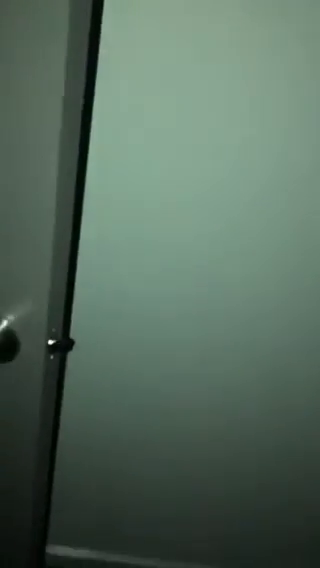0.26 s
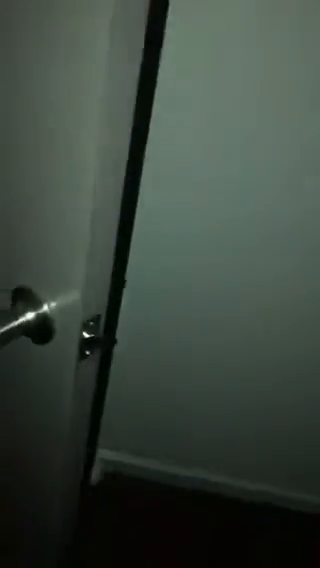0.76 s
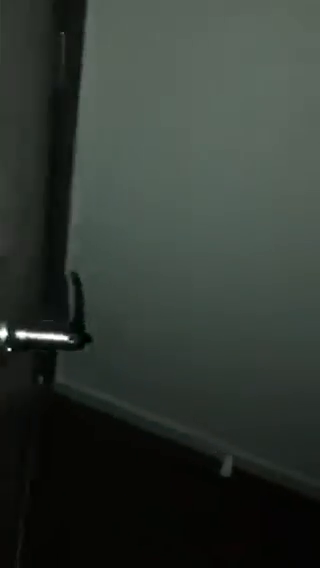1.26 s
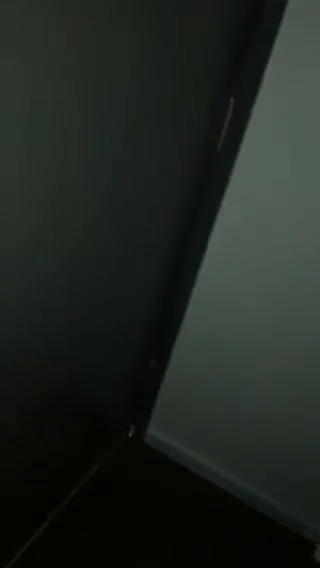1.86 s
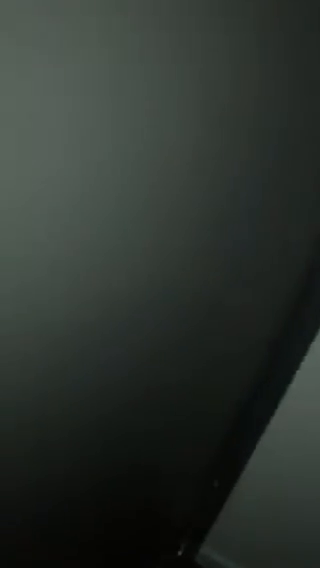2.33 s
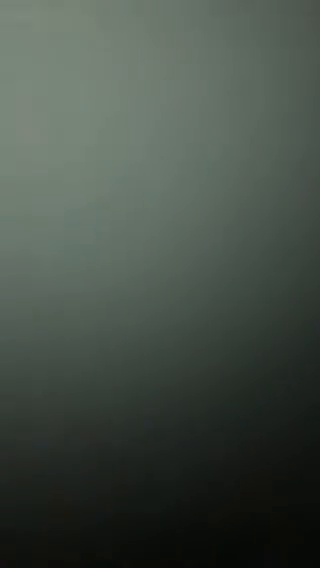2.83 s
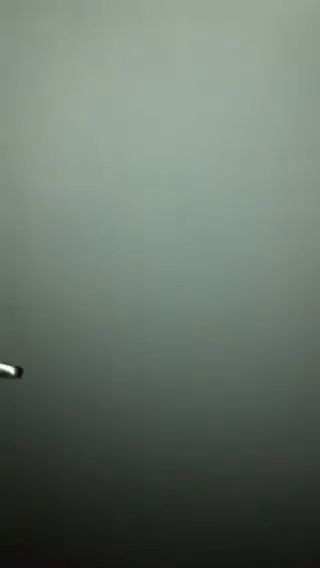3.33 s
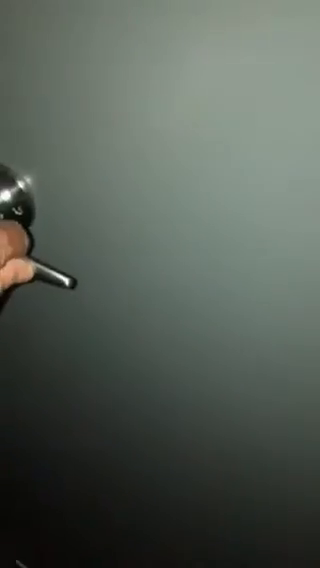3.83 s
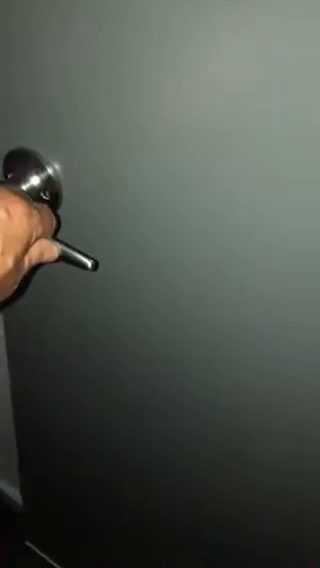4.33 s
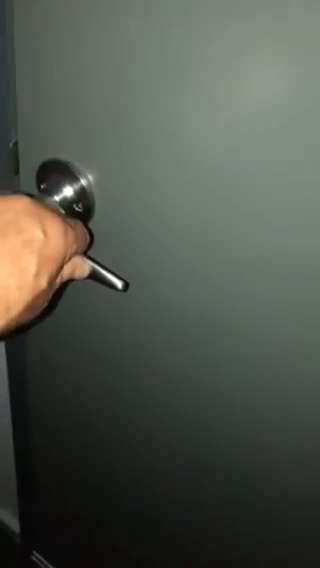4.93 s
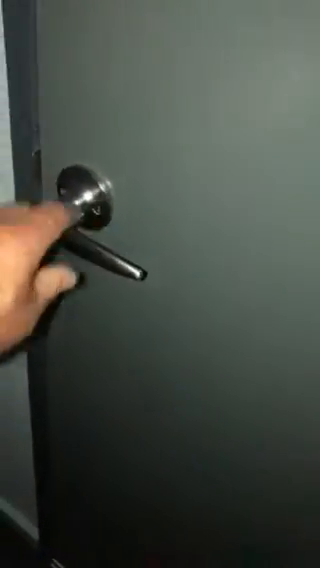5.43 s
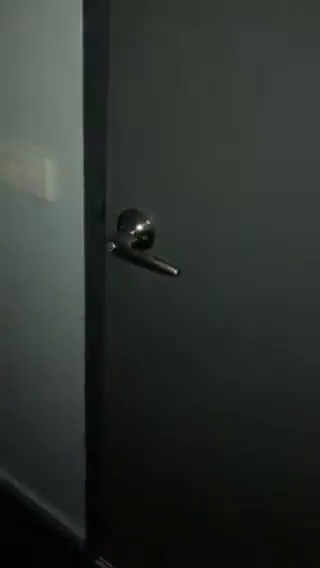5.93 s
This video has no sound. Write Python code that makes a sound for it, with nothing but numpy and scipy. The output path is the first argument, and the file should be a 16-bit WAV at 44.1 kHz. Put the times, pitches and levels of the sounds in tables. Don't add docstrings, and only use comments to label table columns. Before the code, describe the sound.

Phone microphone at arm's length from a door in an empty reverberant space. Quiet air and a wavering low hum behind the wall. Muffled footsteps, a low thud and irregular wooden knocks come first, with sleeve rustle and tiny clicks. The lock then clacks crisply, catches, and the lever drops with the loudest metallic crack, followed by a soft door thud and settling feet in the fading echo.

```python
import sys
import numpy as np
from scipy import signal
from scipy.fft import rfft, irfft
from scipy.io import wavfile
from scipy.ndimage import uniform_filter1d

SR = 44100
rng = np.random.default_rng(int(sys.argv[2]) if len(sys.argv) > 2 else 0)


def generate_wav(sig):
    pcm = np.round(np.clip(np.atleast_2d(sig).T, -1, 1) * 32767).astype(np.int16)
    wavfile.write(sys.argv[1], SR, pcm)


def to_linear_factor(level_db):
    exponent = np.asarray(level_db, float) / 20
    return 10 ** exponent


N = 272559
T = np.arange(N) / SR

# frequency in Hz, density in dB per Hz.
AIR_COLOUR = [(18, -36), (55, -5), (110, -5), (300, -10.5), (1040, -26.5), (2290, -25.5), (2900, -46),
              (16000, -45)]
AIR_DB = -63.5
# frequency in Hz, rms level in dB.
MOTOR_LINES = [(75.5, -63), (151, -70), (228, -73)]
# time in seconds, level in dB.
MOTOR_SWELL = [(0, -12), (.4, -6.5), (1, -5), (1.6, -27), (2.4, -8), (3.2, -4.5), (3.8, -1.5), (4.4, -1.5),
               (5.2, -4), (5.8, -7.5), (6.18, 0)]

# centre in Hz, t60 in seconds, level in dB.
SHED_BANDS = [(175, 0.56, 10.5), (310, 1.14, 3.5), (795, 0.83, -0.5), (1443, 1.41, -1), (2740, 0.95, -9.5),
              (5400, 1.36, -13.5), (8000, 0.84, -9), (12940, 0.6, -6)]
# delay in seconds, level in dB.
WALL_ECHOES = [(.0042, -36), (0.0173, -32.5), (0.0211, -58)]
SHED_DB, BUILD_S = -9, .008
PATHS = 7

# start in seconds, hold in seconds, level in dB.
SOLE_STROKES = [(0.4, 0.009, -58.5), (0.81, 0.36, -58), (1.295, 0.017, -60.5), (1.59, 0.0089, -70),
                (1.703, 0.24, -64.5), (2.01, 0.21, -63.5), (2.282, 0.03, -55), (2.504, 0.0062, -49),
                (2.657, 0.11, -65.5), (2.994, 0.13, -69), (3.2, .1, -69), (3.776, .1, -66),
                (4.01, 0.22, -74), (4.776, 0.0066, -48), (5.285, 0.18, -47), (5.642, .05, -63),
                (5.87, 0.28, -73.5), (6.18, .01, -59.5)]
# start in seconds, hold in seconds, level in dB.
SLEEVE_STROKES = [(.3, 0.94, -73.5), (.82, 0.058, -68.5), (1.05, 0.43, -79), (1.39, 0.018, -66.5),
                  (1.59, .01, -67.5), (1.85, 0.067, -74), (2.24, 0.017, -68), (2.42, .11, -73),
                  (2.66, .01, -74), (2.99, 0.22, -71), (3.3, 0.045, -77), (3.712, 0.15, -66),
                  (4.1, 0.17, -94.5), (4.7, 0.09, -61), (5.38, .01, -71.5), (5.7, .01, -62),
                  (5.87, .1, -71), (6.18, .01, -62)]
# start in seconds, hold in seconds, level in dB.
PALM_STROKES = [(.3, .13, -80), (.82, .01, -76), (1.15, 0.09, -86), (1.291, 0.11, -62.5),
                (1.42, 0.017, -75), (1.54, 0.083, -73), (2.26, 0.058, -75), (2.53, 0.0085, -67),
                (2.66, 0.28, -85), (2.99, 0.0075, -65), (3.71, 0.06, -78), (4.782, 0.012, -74),
                (5.38, .01, -63), (5.7, 0.21, -78), (6.12, .01, -78)]
# rise in dB per second, fall in dB per second, rest level in dB.
STROKE_SHAPES = [
    (200, 120, -100.5),
    (350, 89, -77.5),
    (500, 300, -87),
]

# time in seconds, level in dB.
HINGE_LEVEL = [(1.66, -100), (1.72, -77), (1.8, -76), (1.9, -75), (1.97, -100)]
HINGE_HZ, HINGE_WIDTH_HZ = 4730, 200

# start in seconds, peak in dB, leaf in dB, floor heave in dB.
WEIGHT_THUDS = [(0.037, -57, 4.5, -40), (0.383, -42.5, -8, -5.5), (0.602, -48, -20, -7), (0.751, -61, 8, 9),
                (1.092, -28.5, -5, -9), (2.082, -41.5, -2, -28), (2.258, -40, -8, -12),
                (2.475, -55, -6, -13), (2.633, -45.5, -17, -22), (2.778, -49, -3.5, -23),
                (2.904, -48, -7, -13), (2.969, -43.5, -4.5, -20), (3.121, -41.5, -3.5, -12),
                (3.261, -51, -11, -27), (4.533, -31, -8.5, -21.5), (5.027, -38, -2, -26),
                (5.06, -38.5, -22, -11.5), (5.359, -36, -13, -32), (5.378, -46, 11.5, -14),
                (5.653, -40.5, -7, -10.5), (5.873, -58.5, 12, -26)]
# frequency in Hz, width in Hz, level in dB.
BOARD_MODES = [(154.4, 26.7, -2), (195.1, 27.2, 1.5), (284.1, 85, -3.5), (394.5, 73, -4.5)]
# frequency in Hz, width in Hz, level in dB.
LEAF_MODES = [(72.7, 6.8, 0), (97.8, 14, -2)]
# frequency in Hz, width in Hz, level in dB.
JOIST_MODES = [(46.8, 17, 0)]
SWELL_S, THUD_T60_S = 0.0063, 0.47
SWELL_FASTER = 0.2

# start in seconds, peak in dB, body in Hz, room share in dB.
HOLLOW_KNOCKS = [(0.035, -43.5, 575, 4), (0.372, -40.5, 760, 6.5), (0.654, -49, 650, 12),
                 (0.742, -41, 785, 2), (1.077, -36.5, 623, 6), (2.08, -40.5, 721, 3.5),
                 (2.258, -39.5, 875, -6), (2.451, -44, 800, 6.5), (2.493, -38.5, 353, 3.5),
                 (2.627, -41.5, 680, 7.5), (2.899, -35.5, 600, 5), (3.118, -36.5, 580, 5.5),
                 (3.118, -33.5, 1360, -4), (3.149, -40, 790, 4), (3.25, -36, 530, -1), (4.531, -41, 770, 9),
                 (5.022, -24.5, 793, 6), (5.064, -25, 480, -2), (5.324, -35.5, 427, 6.5),
                 (5.405, -35.5, 630, -17.5), (5.667, -45, 600, 6.5), (6.1694, -36, 417, -14)]
# start in seconds, peak in dB, body in Hz, room share in dB.
HARD_RAPS = [(0.0352, -39, 2180, 6.5), (0.371, -38.5, 1120, 7.5), (0.7392, -42, 1010, 8),
             (1.077, -33.5, 1540, 7), (2.006, -46, 1810, 4), (2.0802, -51.5, 1060, 18),
             (2.2549, -37, 1580, 6.5), (2.4464, -42, 1530, 5), (2.483, -37.5, 1050, 6.5),
             (2.6275, -38.5, 1040, 3), (2.8978, -30, 1130, 3), (3.1416, -43.5, 1300, 6),
             (4.0953, -49, 1690, -1.5), (4.535, -34, 1620, 14), (4.5376, -14, 1400, -2),
             (5.0154, -34.5, 1020, -10), (5.0636, -19, 1755, 7.5), (5.341, -33.5, 1300, 6.5),
             (5.671, -46.5, 1500, 9)]
HOLLOW_T60_S, HOLLOW_SCATTER_S = .01, .0045
HARD_T60_S, HARD_SCATTER_S = .0035, .0013

# start in seconds, peak in dB, fine edge in dB, room share in dB.
GRIT_TICKS = [(0.031, -44.5, -7.5, 13.5), (0.372, -64, -13, 31), (4.757, -45.5, -25, -18),
              (1.0822, -43.5, -28, 10), (1.099, -48.5, -24, 15), (1.3856, -61, 10, 4),
              (1.3897, -52.5, -9, -13), (2.006, -41, -6.5, 18), (2.0306, -50, -11, 10),
              (2.2545, -47, -27, 16.5), (2.448, -45.5, -5, 8), (2.4627, -51, -4, -12),
              (2.4847, -41, -9.5, 11.5), (2.518, -50, -17, -4), (2.624, -41, -4, 10.5), (2.64, -51, -13, 9),
              (2.856, -51.5, -24, -5), (2.8982, -37.5, 1.5, 8), (2.912, -44, -11, 9),
              (4.777, -42, -26, -15), (4.5263, -48, -5, -13.5), (4.095, -44, -28, 5.5),
              (4.5115, -60, -12, -18), (5.353, -43, -3, -6), (5.387, -51, 1, 9), (5.666, -60, 1, 21)]
GRIT_HZ, GRIT_CONTACT_S, GRIT_SPREAD = 3600, 0.0017, .07
GRIT_LONGER = 0.61
GRIT_HIGHER = 0.1
# start in seconds, peak in dB, ring in Hz, room share in dB.
LATCH_TICKS = [(4.5328, -29, 4680, -6), (4.5334, -37, 2560, -10), (4.5345, -15.5, 3150, 5.5),
               (4.5362, -16.5, 6300, 9.5), (4.534, -25.5, 9400, -12), (4.5403, -28, 13500, -10),
               (4.5498, -29, 6300, -15.5), (5.0018, -32, 2400, 8), (5.0142, -37, 4000, 3),
               (5.021, -35.5, 6200, -1), (5.0212, -33, 13500, 1.5), (5.027, -27, 6500, -5),
               (5.044, -23, 3480, 16), (5.052, -49, 7460, 2.5), (5.059, -25.5, 6990, 0.5),
               (5.0625, -18.5, 7130, 6.5), (5.0620, -16.5, 14600, 2.5), (5.064, -6.5, 4080, -5.5),
               (5.0681, -18, 5630, 8)]
LATCH_EDGE_DB, EDGE_DB_PER_OCTAVE = -26.5, 5
LATCH_CONTACT_S, CHATTER_MAX_S = 0.0005, .002
CHATTER = 2.1

# start in seconds, peak in dB, room share in dB.
LOCK_BLOWS = [
    (4.5351, -21, 2),
    (5.0215, -28, 2.5),
    (5.0618, -27.5, -1),
]
# frequency in Hz, width in Hz, level in dB.
DRAWN_MODES = [(1465, 540, 3), (2840, 270, -2), (3235, 39, -9), (4540, 360, -4), (5260, 72, -13.5),
               (5850, 78, -10), (8180, 44, -21.5), (10140, 810, -6)]
# frequency in Hz, width in Hz, level in dB.
CATCH_MODES = [(832, 78, -9), (6200, 250, -11), (9700, 300, -8), (13500, 500, -21.5)]
# frequency in Hz, width in Hz, level in dB.
DROPPED_MODES = [(1120, 92, -0.5), (2030, 270, -11), (3450, 460, 10.5), (3980, 110, -3), (6200, 600, 10.5),
                 (7900, 51, -3), (11500, 900, -12), (14800, 44, -15.5)]

SLAM_S, SLAM_LENGTH_S, SLAM_FROM_HZ, SLAM_TO_HZ = 5.3255, .042, 112, 88
SLAM_DB, SLAM_SECOND_DB = -31, -8


def unit(x):
    return x / np.sqrt(np.mean(x ** 2))


def band(x, hz, width_hz):
    return signal.lfilter(*signal.iirpeak(min(hz, .44 * SR), max(hz / width_hz, .3), SR), x)


def shaped(hz, db, size):
    f = np.log(np.arange(size // 2 + 1) * SR / size + 1)
    gain = to_linear_factor(np.interp(f, np.log(hz), db))
    return unit(irfft(rfft(rng.standard_normal(size)) * gain, size))


def walk(rate):
    hold = int(SR / rate)
    levels = rng.standard_normal(N // hold + 1)
    return 0.79 * uniform_filter1d(np.repeat(levels, hold), hold)[:N]


def add(bus, s, sound):
    i = int(s * SR)
    bus[i:i + len(sound)] += sound[:len(bus) - i]


def ring(push, hz, t60):
    width_hz = 1.66 * np.log(1000) / np.pi / max(t60, .0002)
    y = band(band(push, hz, width_hz), hz, width_hz)
    return y / np.abs(y).max()


def background():
    hum = 0
    for hz, db in MOTOR_LINES:
        level = to_linear_factor(db + 3.6 * walk(1.8)) * np.sqrt(2)
        turn = 2 * np.pi * np.cumsum(hz * (1 + 0.0057 * walk(2.0))) / SR
        hum = hum + level * np.sin(turn)
    air = shaped(*np.transpose(AIR_COLOUR), N) * to_linear_factor(AIR_DB + 0.27 * walk(16.0))
    return air + hum * to_linear_factor(np.interp(T, *np.transpose(MOTOR_SWELL)))


def shed(paths, size=65536):
    out, t = 0, T[:size]
    for x in paths:
        tail = 0
        for hz, t60, db in SHED_BANDS:
            noise = band(band(rng.standard_normal(size), hz, 1.12 * hz), hz, 1.12 * hz)
            tail = tail + unit(noise) * np.sqrt(hz / 1400) * to_linear_factor(db - 60 * t / t60)
        response = to_linear_factor(SHED_DB - 34.5) * tail * (1 - np.exp(-(t / BUILD_S) ** 2))
        for s, db in WALL_ECHOES:
            add(response, s, to_linear_factor(db) * np.array([.5, .5]))
        out = out + signal.fftconvolve(x, response)[:N]
    return out


def strokes(rows, rise, fall, rest_db):
    power = to_linear_factor(rest_db) ** 2
    for s, hold, db in rows:
        before, after = np.maximum(s - T, 0), np.maximum(T - s - hold, 0)
        power = power + to_linear_factor(db - rise * before - fall * after) ** 2
    return np.sqrt(power)


def rub():
    # Hz, dB
    colours = [([135, 504.5, 1407, 2798.5, 5004], [-7.0, -5.5, -7.5, -12.0, -55.5]),
               ([1201.5, 2570, 5100, 7495, 11006], [-10, 10.8, 7.0, 1.5, -6]),
               ([7000, 7800, 8900, 15500, 17003], [-35, 5.8, 6.7, 3.0, 5])]
    out = np.zeros(N)
    tables = (SOLE_STROKES, SLEEVE_STROKES, PALM_STROKES)
    for (hz, db), rows, shape in zip(colours, tables, STROKE_SHAPES):
        grain = to_linear_factor(2.85 * walk(60))
        out += shaped(hz, db, N) * strokes(rows, *shape) * grain
    return out


def hinge():
    drag = band(rng.standard_normal(N), HINGE_HZ, HINGE_WIDTH_HZ)
    return unit(drag) * to_linear_factor(np.interp(T, *np.transpose(HINGE_LEVEL)))


def beat(modes, t, chance):
    y = 0
    for (hz, width_hz, db), off in zip(3 * modes, chance):
        y = y + to_linear_factor(db) * np.sin(2 * np.pi * (hz + 2 * width_hz * (off - .5)) * t)
    return unit(y)


def thuds(size=32768):
    out, t = np.zeros(N), T[:size]
    for s, db, leaf_db, heave_db in WEIGHT_THUDS:
        chance = rng.random(3 * len(BOARD_MODES))
        y = beat(BOARD_MODES, t, chance)
        y = y + to_linear_factor(leaf_db) * beat(LEAF_MODES, t, chance)
        y = y + to_linear_factor(heave_db + 7.0) * beat(JOIST_MODES, t, chance)
        swell = 1 - np.exp(-t / SWELL_S * to_linear_factor(SWELL_FASTER * (db + 38.5)))
        add(out, s, to_linear_factor(db - 60 * t / THUD_T60_S) * swell * y / 2)
    return out


def slam():
    out, part = np.zeros(N), T[:int(SLAM_LENGTH_S * SR)] / SLAM_LENGTH_S
    turn = 2 * np.pi * np.cumsum(SLAM_FROM_HZ + (SLAM_TO_HZ - SLAM_FROM_HZ) * part) / SR
    swings = np.sin(turn) + to_linear_factor(SLAM_SECOND_DB) * np.sin(2 * turn)
    add(out, SLAM_S, to_linear_factor(SLAM_DB) * np.sin(np.pi * part) * swings)
    return out


def knocks(size=8192):
    near, far, t = np.zeros(N), np.zeros((PATHS, N)), T[:size]
    rows = [(*row, HOLLOW_T60_S, HOLLOW_SCATTER_S) for row in HOLLOW_KNOCKS]
    rows += [(*row, HARD_T60_S, HARD_SCATTER_S) for row in HARD_RAPS]
    for k, (s, db, hz, room_db, t60, scatter) in enumerate(sorted(rows)):
        contacts = rng.standard_normal(size) * np.exp(-t / scatter)
        add(near, s, to_linear_factor(db) * ring(contacts, hz, t60))
        add(far[-k % PATHS], s, to_linear_factor(db + room_db) * ring(signal.unit_impulse(size), hz, 0.5 * t60))
    return near, far


def grit_blows():
    rows = []
    for s, db, edge_db, room_db in GRIT_TICKS:
        hz = GRIT_HZ * (1 + GRIT_SPREAD * rng.standard_normal()) * to_linear_factor(GRIT_HIGHER * (db + edge_db + 55.5))
        contact = GRIT_CONTACT_S * to_linear_factor(GRIT_LONGER * (db + 56.5))
        rows.append((s, db, hz, edge_db, contact, room_db))
    return rows


def latch_blows():
    rows = []
    for s, db, hz, room_db in LATCH_TICKS:
        edge_db = LATCH_EDGE_DB + EDGE_DB_PER_OCTAVE * np.log2(hz / GRIT_HZ)
        contact = min(LATCH_CONTACT_S * (hz / 3500) ** CHATTER, CHATTER_MAX_S)
        rows.append((s, db, hz, edge_db, contact, room_db))
    return rows


def strike(push, hz, edge_db):
    return ring(push, hz, 5 / hz) + to_linear_factor(edge_db) * ring(push, 11740, 0.00061)


def ticks(size=2048):
    near, far, t = np.zeros(N), np.zeros((PATHS, N)), T[:size]
    for k, (s, db, hz, edge_db, contact, room_db) in enumerate(latch_blows() + grit_blows()):
        push = rng.standard_normal(size) * np.exp(-t / max(contact, .0001))
        add(near, s, to_linear_factor(db) * strike(push, hz, edge_db))
        add(far[k % PATHS], s, to_linear_factor(db + room_db) * strike(signal.unit_impulse(size), hz, edge_db - 1.0))
    return near, far


def lock(size=4096):
    near, far = np.zeros(N), np.zeros((PATHS, N))
    push = signal.unit_impulse(size)
    states = (DRAWN_MODES, CATCH_MODES, DROPPED_MODES)
    for k, ((s, db, room_db), modes) in enumerate(zip(LOCK_BLOWS, states)):
        y = np.zeros(size)
        for m, (hz, width_hz, mode_db) in enumerate(modes):
            t60 = 2.32 / np.clip(width_hz, 0.023 * hz, 900)
            y += (-1) ** m * to_linear_factor(mode_db) * ring(push, hz, t60)
        add(near, s, to_linear_factor(db) * y)
        add(far[k], s, to_linear_factor(db + room_db) * y)
    return near, far


def scene():
    near, far = zip(knocks(), ticks(), lock())
    cloth = rub()
    room = shed(sum(far) + 0.14 * cloth)
    direct = sum(near) + thuds() + slam() + cloth + hinge()
    return (background() + room + direct)[None]


def low_pass(x):
    return signal.sosfilt(signal.butter(12, 16810, fs=SR, output="sos"), x)


def record(dry):
    low = signal.butter(6, 39, "high", fs=SR, output="sos")
    top = signal.ellip(8, .2, 32, 15750, fs=SR, output="sos")
    mix = signal.sosfilt(np.vstack([low, top]), dry)
    return low_pass(mix)


dry = scene()
out = record(dry)
generate_wav(out)
```